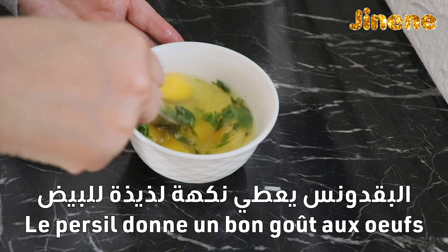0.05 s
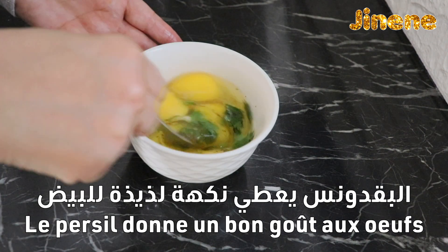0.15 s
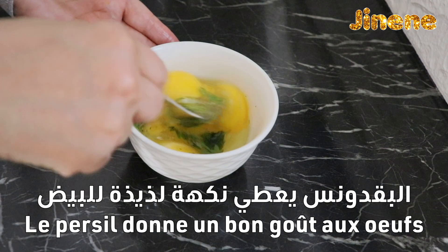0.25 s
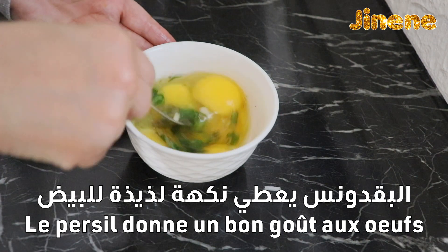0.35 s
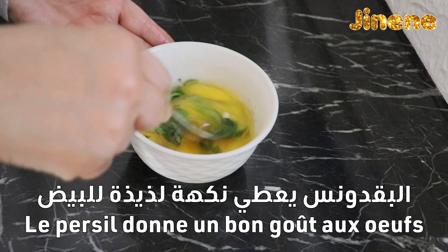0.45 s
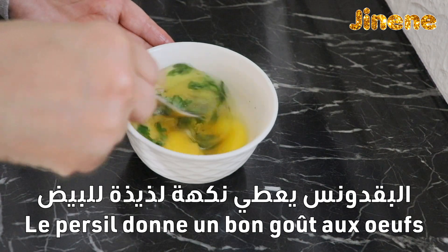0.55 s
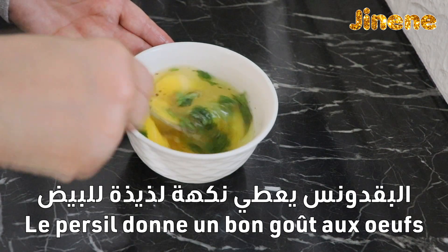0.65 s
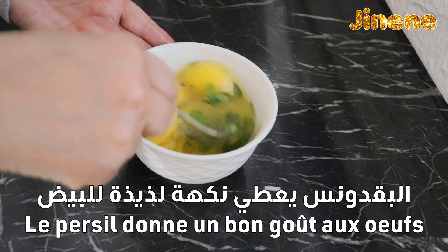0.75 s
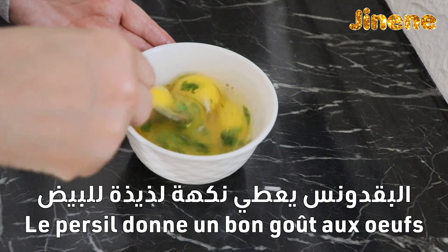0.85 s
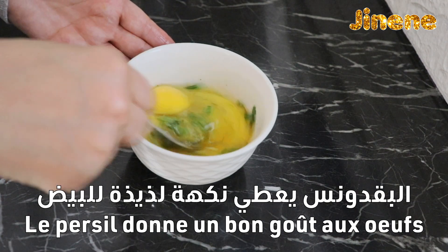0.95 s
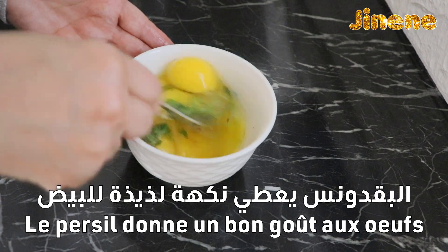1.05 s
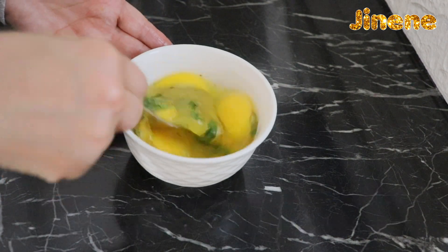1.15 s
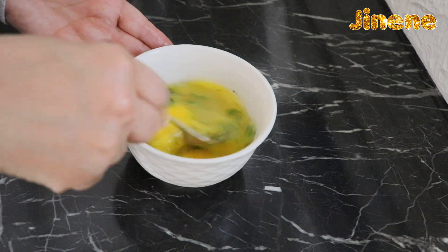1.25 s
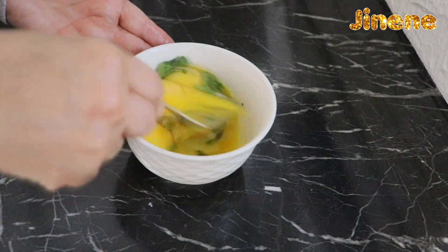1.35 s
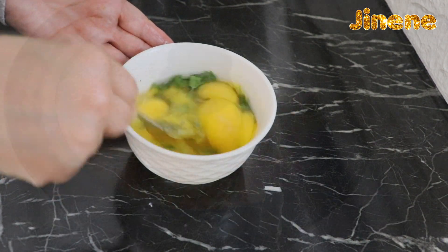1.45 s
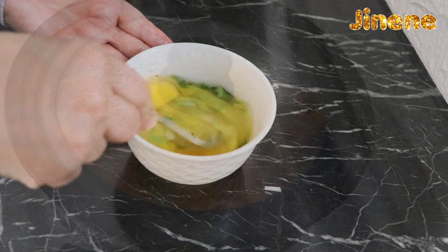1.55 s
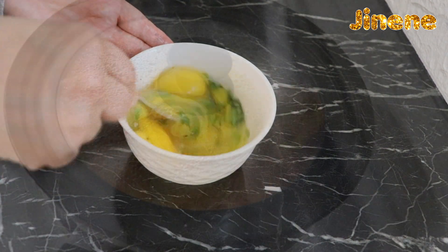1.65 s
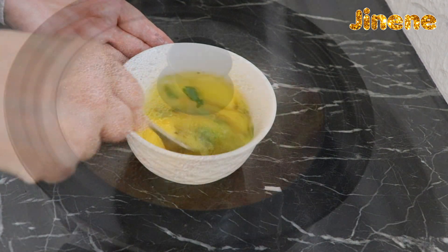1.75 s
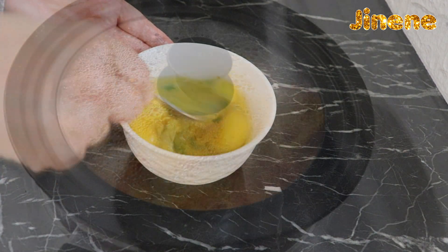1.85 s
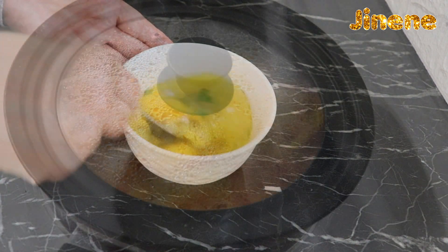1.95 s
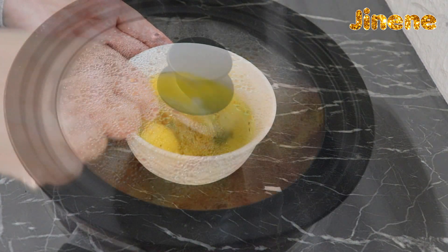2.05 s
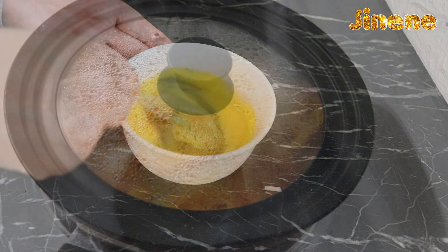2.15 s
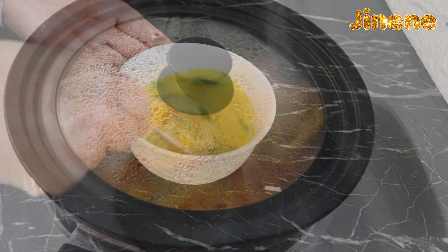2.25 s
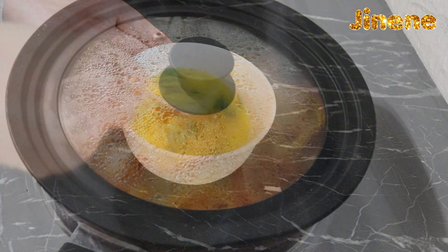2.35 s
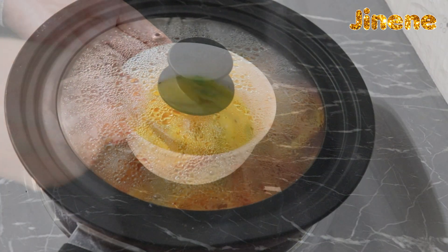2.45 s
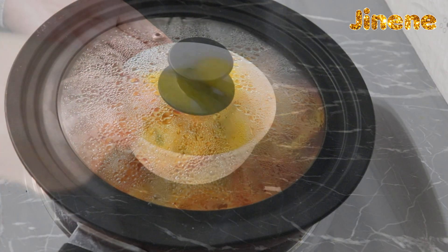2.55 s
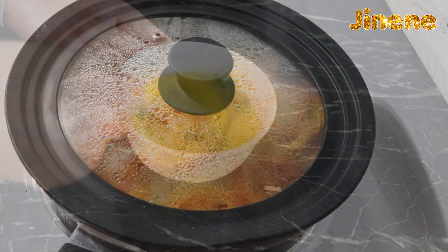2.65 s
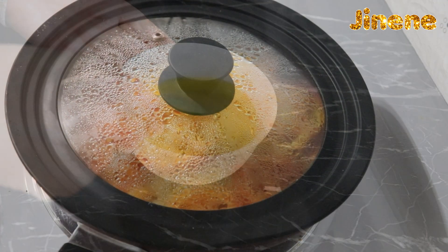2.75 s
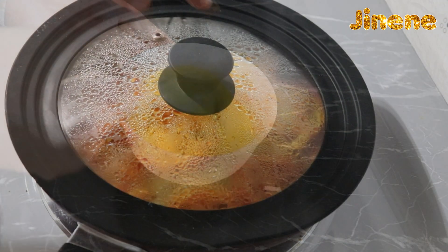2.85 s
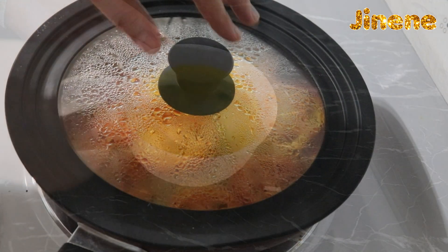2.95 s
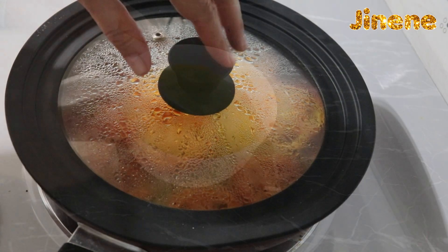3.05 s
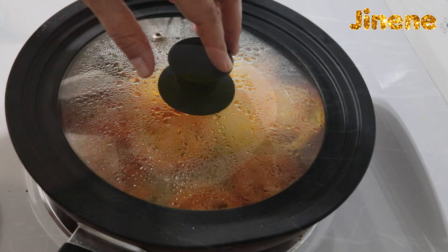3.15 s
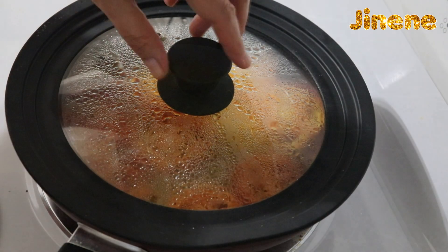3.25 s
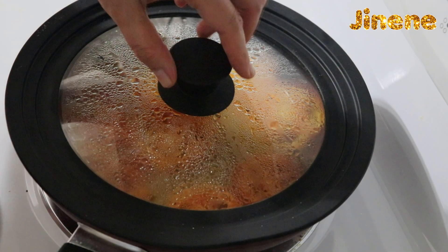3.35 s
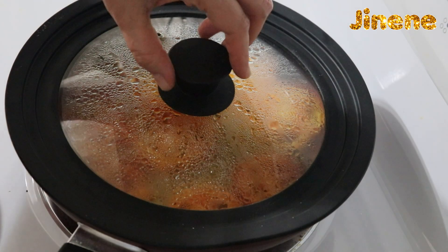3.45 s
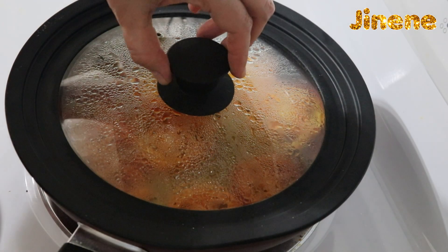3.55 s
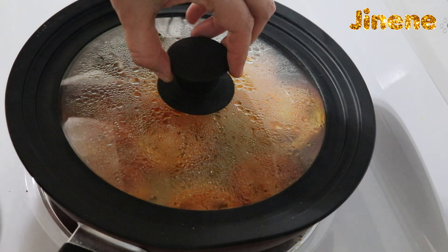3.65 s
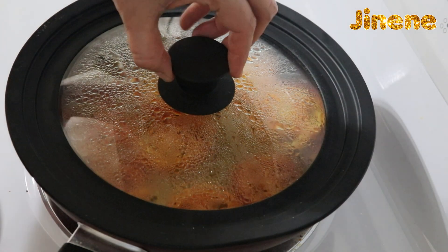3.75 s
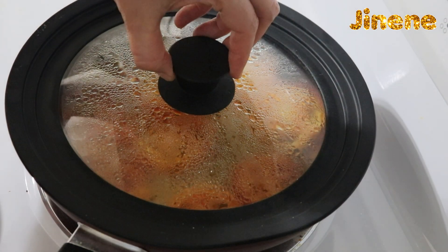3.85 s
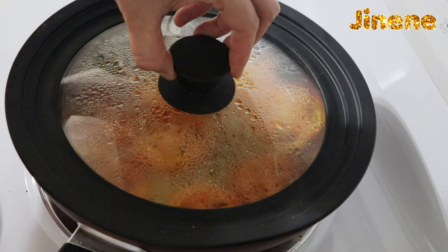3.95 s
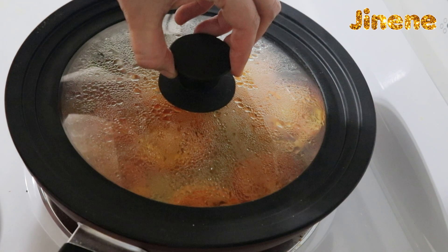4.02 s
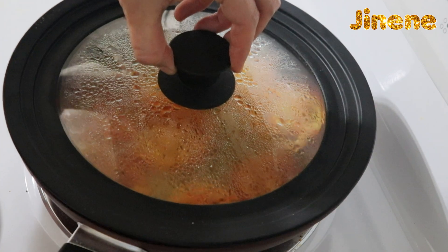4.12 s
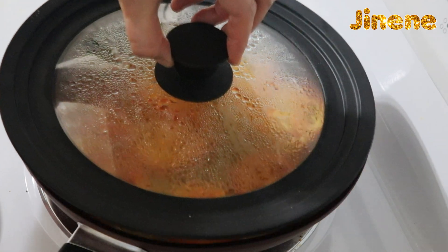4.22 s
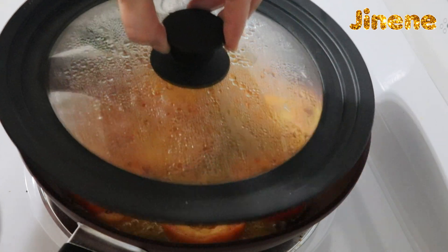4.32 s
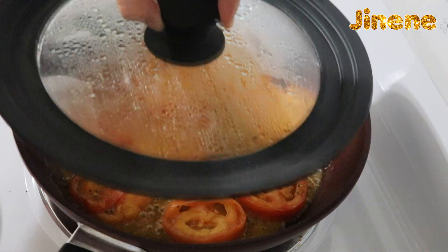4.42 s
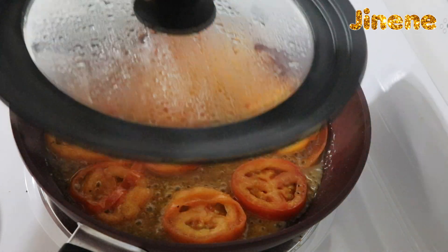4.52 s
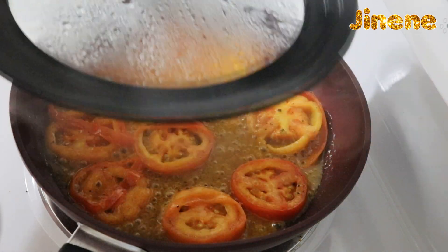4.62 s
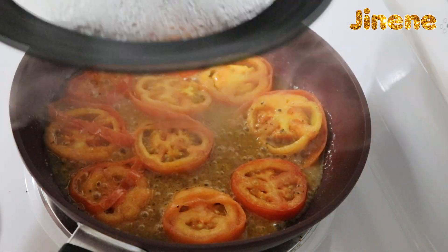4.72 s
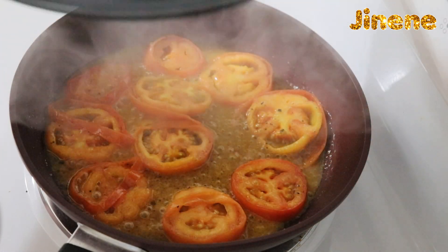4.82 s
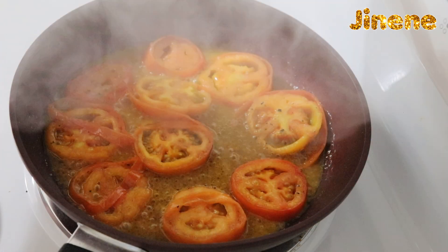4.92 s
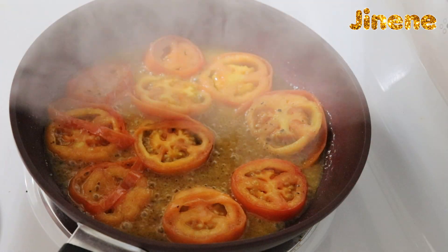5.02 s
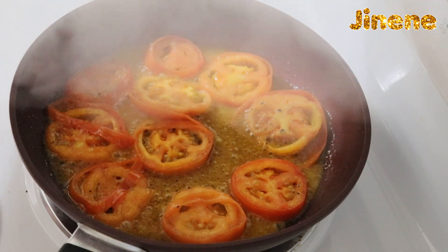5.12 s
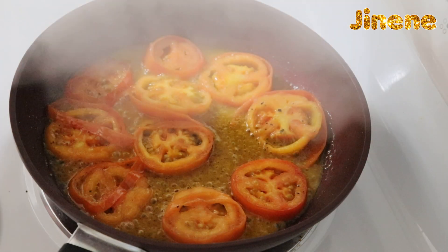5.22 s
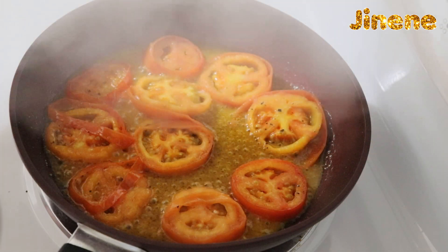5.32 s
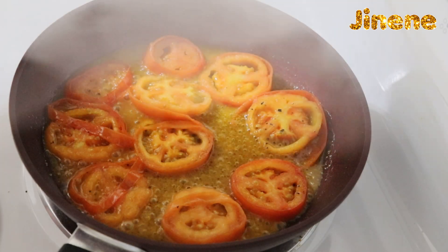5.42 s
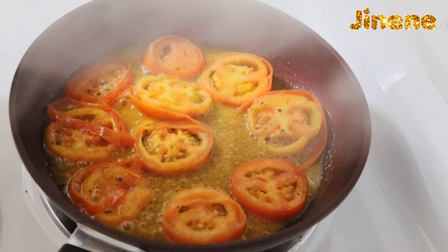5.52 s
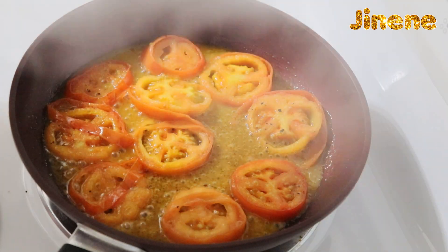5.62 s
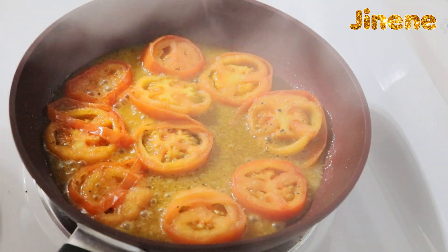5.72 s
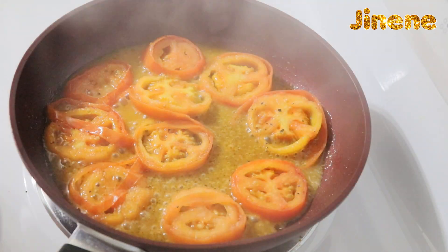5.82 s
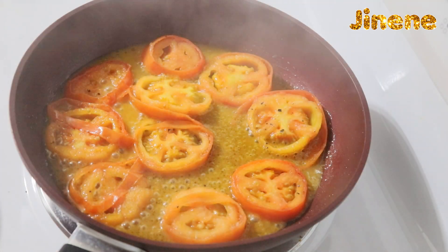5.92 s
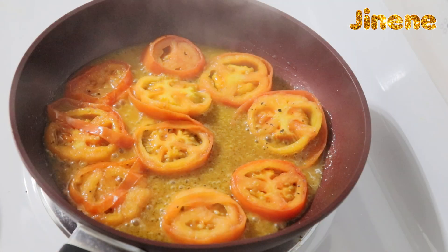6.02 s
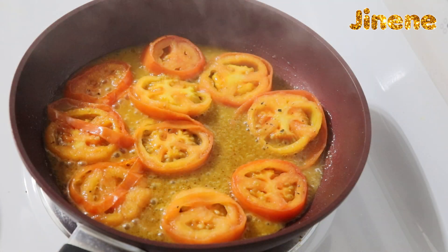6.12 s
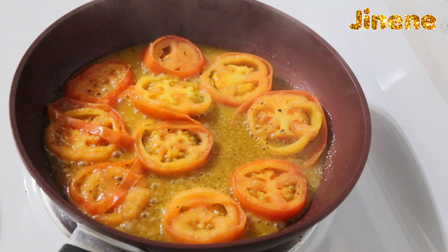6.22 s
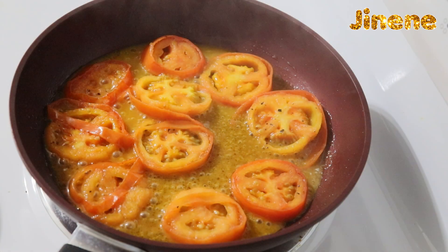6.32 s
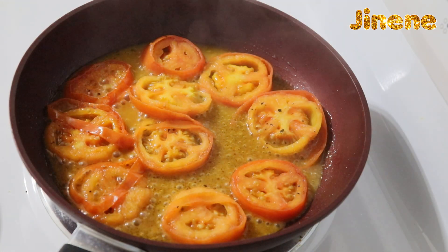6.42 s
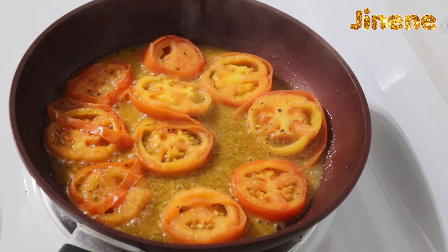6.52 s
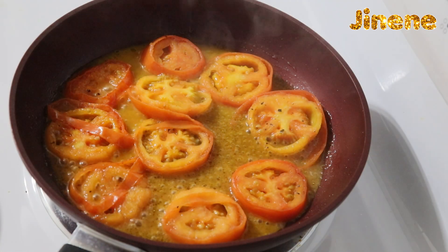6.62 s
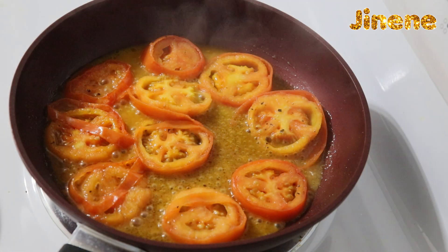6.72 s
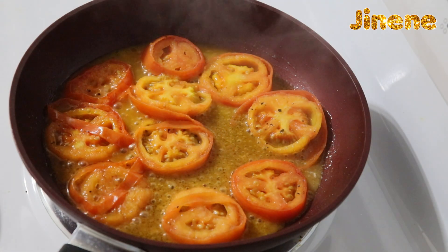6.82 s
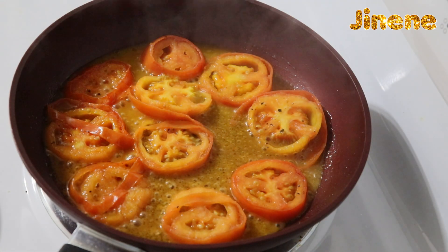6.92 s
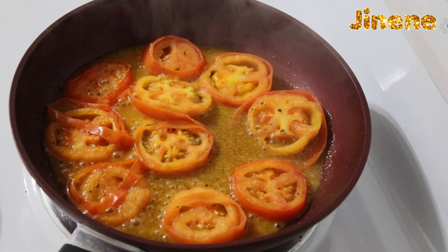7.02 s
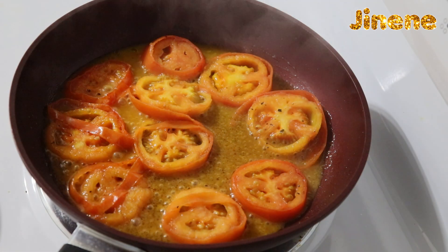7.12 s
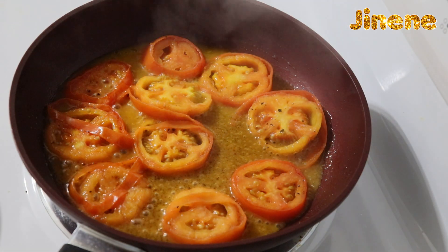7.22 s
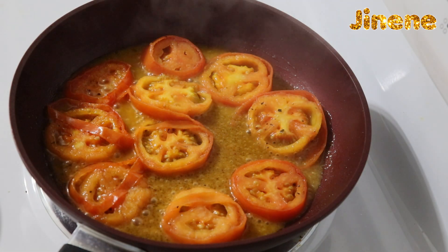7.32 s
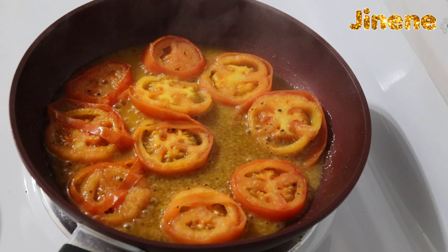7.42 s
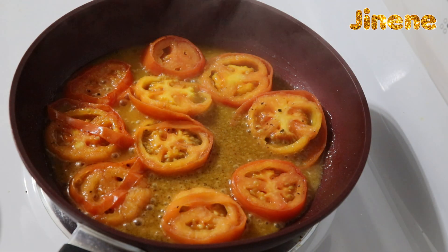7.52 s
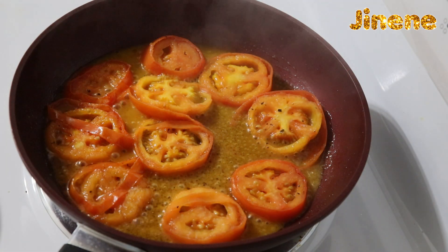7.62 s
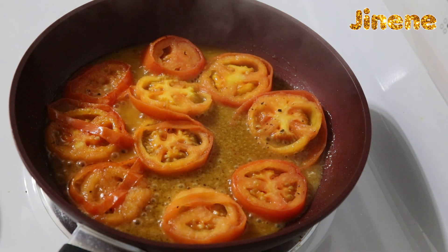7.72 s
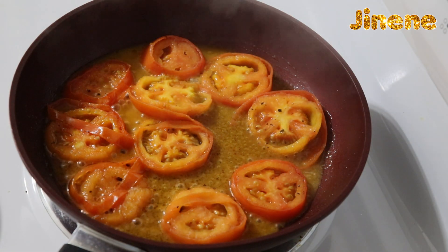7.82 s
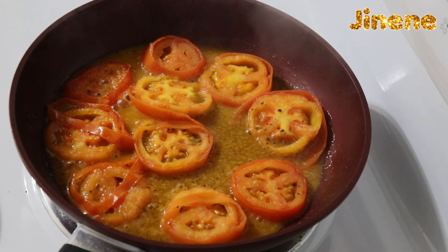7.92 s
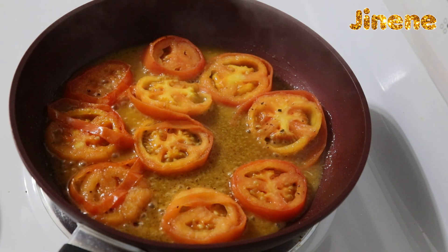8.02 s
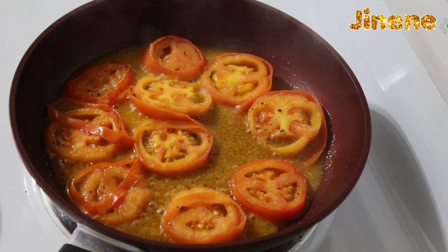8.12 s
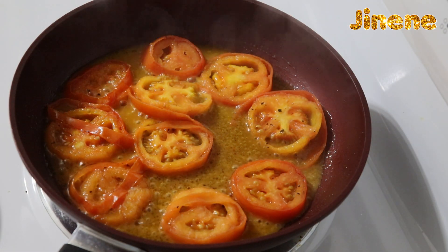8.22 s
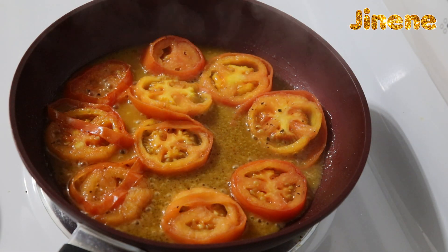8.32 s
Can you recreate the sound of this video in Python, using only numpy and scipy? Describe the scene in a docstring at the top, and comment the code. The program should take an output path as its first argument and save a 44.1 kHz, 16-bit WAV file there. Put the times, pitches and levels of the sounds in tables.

```python
"""A fork beats eggs in a ceramic bowl on a stone counter in a small kitchen, about six strokes a second.
Strokes clink through the bowl's damped modes and throw the egg over with low thuds; air pockets burst
as rising tones, tines squeak as gliding tones, and stirring adds a wet swish of noise and blips.
The beating fades away, then tomato slices sizzle in a pan of oil on a stove: ringing bubbles, crackle,
steam jets and spits, with a low simmer and rumble. Quiet room tone runs throughout."""
import sys
import numpy as np
from scipy import signal
from scipy.fft import rfft, irfft, next_fast_len
from scipy.io import wavfile
from scipy.ndimage import uniform_filter1d, map_coordinates

SR = 44100
rng = np.random.default_rng(int(sys.argv[2]) if len(sys.argv) > 2 else 0)


def log_audio(samples):
    """Write samples as a 16-bit WAV file to the path given in sys.argv[1]."""
    # one column per channel
    frames = np.atleast_2d(samples).T
    # limit to full scale, then quantise
    limited = np.clip(frames, -1, 1)
    pcm = np.round(limited * 32767).astype(np.int16)
    wavfile.write(sys.argv[1], SR, pcm)


N = 369116  # length in samples

# The turns of the fork. Each row: start in seconds, clink level in dB, clack (middle pitches) in dB,
# ping of the tines in dB beside the clink, scoop level in dB, landing level of the egg in dB,
# flight of the egg in seconds.
STROKES = [(0.0759, -13, -3.5, -32, -13, -11, 0.058), (0.2405, -11.5, -6.5, -11.5, -9.5, -15.5, 0.073),
           (0.4045, -10.5, 1, -30, -12, -13, 0.038), (0.57, -13.5, -7, 1, -17.5, -10, 0.043),
           (0.7135, -8.5, -4.5, -12, -9, -9.5, 0.064), (0.8803, -13, -10.5, -5, -13, -11.5, 0.054),
           (1.0484, -16, -7.5, -21, -17.5, -12, 0.042), (1.2023, -11, -3.5, -5, -15, -13.5, 0.052),
           (1.371, -8, -2.5, -27, -10, -7, 0.03), (1.5377, -11, -4, -11, -15.5, -14, 0.056),
           (1.706, -10.5, -0.5, -23, -13, -15.5, 0.036), (1.868, -13, -5.5, -17, -11.5, -23, .03),
           (2.0397, -11.5, -3, -19, -14, -13, .036), (2.2166, -11.5, -3.5, -12, -15.5, -16.5, .045),
           (2.383, -12, -5, -9.5, -15.5, -22, 0.05), (2.5568, -15, -14.5, -11.5, -13, -14.5, 0.027),
           (2.7083, -13, -3.5, -35, -21, -9.5, 0.047), (2.9034, -15, -6, -30, -18, -24, 0.025),
           (3.0754, -14.5, -5, -12, -20.5, -17, 0.063), (3.223, -16, -2, -20, -23, -16.5, 0.038)]

FADE_FROM_S, FADE_TO_S, FADE_POWER = 1.53, 3.364, 0.84  # the beating dies away
FRY_START_S = 3.51


def fork():
    """Each contact bites, rebounds and slides, heard through the damped bowl; the tines ping as well."""
    # Ringing of the tines. Each row: pitch in Hz, level in dB, time to fall 60 dB in seconds.
    tine_modes = [(6800, -4, .05), (7000, 4.5, 0.074), (7090, -4, .045)]
    # Tines scrape along the wall. Each row: start in seconds, length in seconds, level in dB.
    scrape_rows = [(0.219, .012, -39.5), (0.365, 0.019, -48), (1.032, .012, -40), (1.182, 0.017, -38.5),
                   (1.39, 0.043, -41), (1.523, .014, -30), (1.552, 0.039, -41), (1.861, .01, -31),
                   (2.015, 0.029, -49), (2.201, 0.015, -39), (2.368, 0.015, -36.5), (2.535, 0.041, -37),
                   (2.75, 0.044, -38), (2.873, 0.011, -36), (3.06, 0.0081, -36.5), (3.226, .016, -26.5)]
    rebound_s, rebound_loss_db = 0.0075, 12.5  # the fork chatters back onto the wall
    grit_db, grit_t60_s = -19, 0.21  # gritty slide after each contact
    out = np.zeros((2, N))
    t = np.arange(SR // 8) / SR
    lead_s = .004  # room for the rise before a contact's peak
    for start_s, db, clack_db, glint_db, ping_db in contacts():
        press = touch(t - lead_s) + amp(grit_db) * fade(t, grit_t60_s) * (t > lead_s)
        for k, (late, hard) in enumerate(rng.standard_normal((2, 2)), 1):
            delay_s = k * rebound_s * np.exp(0.17 * late)
            press += amp(2 * hard - rebound_loss_db * k) * touch(t - lead_s - delay_s)
        clink = bowl(grit(len(t)) * press, clack_db, glint_db)
        loudness = strength(np.hypot(*clink) / np.sqrt(2), 0.0027)
        add(out, start_s - lead_s + .0005, amp(db - 3.5) * clink / loudness)
        ping = ring(tine_modes, t, scatter_db=1.5, detune=0.0035)
        add(out, start_s, amp(db + ping_db - 7.5) * ping)
    for start_s, length_s, db in scrape_rows:
        size = int(length_s * SR)
        scrape = bowl(grit(size) * np.sqrt(np.hanning(size)), clack_db=-1, glint_db=-16)
        add(out, start_s, amp(db - 1) * scrape / strength(scrape[0], length_s))
    # the glint beams to the left, the clack to the right
    return leaned(out, [(600, 0.13), (2200, -0.69), (4500, 0.1), (8000, -1.0), (13000, 1.34)])


def contacts():
    """Every blow of fork on bowl: start in seconds, then clink, clack, glint and ping in dB."""
    # Stray knocks between strokes. Each row: start in seconds, clink level in dB, clack in dB,
    # ping in dB beside the clink.
    knock_rows = [(0.7019, -14, 2, -9), (1.331, -31, -1, -22), (1.3475, -32, 1, -23), (1.508, -29, -1, -18),
                  (1.8139, -19.5, 0, -25), (2.159, -30.5, -11, -7), (2.194, -26.5, -25, -6),
                  (2.7426, -15.5, 3, -23), (2.851, -29, 4, -27), (2.8882, -20, 1, -26),
                  (3.243, -12, -5.5, -23.5)]
    stroke_glint_db, knock_glint_db = -11, -17.5  # the top treble
    rows = [(s, db, clack_db, stroke_glint_db, ping_db) for s, db, clack_db, ping_db, *_ in STROKES]
    return rows + [(s, db, clack_db, knock_glint_db, ping_db) for s, db, clack_db, ping_db in knock_rows]


def touch(t):
    """The force of one contact, rising quickly to its peak at t = 0 and falling a little slower."""
    bite_s, release_s = 0.0047, 0.0083  # time over 60 dB, for the rise and for the fall
    return fade(np.abs(t), np.where(t < 0, bite_s, release_s))


def grit(size):
    """Spiky noise of tiny slips; it scatters inside the bowl, differently toward each microphone."""
    slips = amp(3.6 * np.clip(rng.standard_normal(size), -2, 2))
    return unit(slips * (0.8 * rng.standard_normal(size) + rng.standard_normal((2, size))))


def bowl(force, clack_db, glint_db):
    """The egg-damped bowl answers a force on its wall with many short-lived tones."""
    # Ringing of the bowl. Each row: pitch in Hz, level in dB, time to fall 60 dB in seconds.
    bowl_modes = [(1576, 5, 0.016), (2250, -4, 0.0077), (2795, 9.5, 0.024), (3760, 13.5, 0.0049),
                  (4640, -18, .015), (5180, 14, 0.0096), (6270, 16.5, 0.0059), (6865, 20, 0.0049),
                  (7640, 10, 0.0058), (8100, 13.5, .007), (8700, 12, 0.0093), (9420, 8, 0.01),
                  (10610, 17, 0.0049), (11650, 7, 0.0074), (12840, 22, 0.0059), (13700, 5, 0.0053),
                  (14400, 24, 0.0056), (14800, 8, 0.0062)]
    answer = ring(bowl_modes, np.arange(SR // 30) / SR, scatter_db=2.6, detune=.004)
    sound = signal.fftconvolve(force, answer[None], axes=1)
    return colour(sound, [(400, -46.5), (1400, clack_db + 5.5), (3200, clack_db + 4.5),
                          (5000, 0), (10000, 2.5), (13000, glint_db + 7.5)])


def egg():
    """A fold of egg lands softly and tumbles on, and its push makes egg and bowl thud on the counter."""
    # Egg and bowl on the counter. Each row: pitch in Hz, level in dB, time to fall 60 dB in seconds.
    body_modes = [(42, -27.5, 0.27), (96.4, -17.5, 0.25), (111.6, -21, 0.32), (151.1, -9.5, 0.26),
                  (166.6, -1, 0.22), (198, -14.5, 0.23), (225.1, -6, 0.18), (259, -4, 0.12),
                  (313.3, -15.5, 0.16), (347, -9.5, .12), (412, -20, 0.17), (470, -20, 0.26)]
    out = np.zeros(N)
    t = np.arange(SR // 4) / SR
    for start_s, db, slap_db in slops():
        push = .02 * rng.standard_normal(len(t)) * fade(t, .08)
        push[0] += 1
        body = ring(body_modes, t, scatter_db=3.5, detune=0.011) * (1 - fade(t, 0.014))  # soft onset
        thud = signal.fftconvolve(push, body)[:len(t)]
        thud = colour(thud, [(25, -47), (42, -4), (58, -28.5), (72, -27.0), (90, 0.0), (200, -4.5),
                             (330, slap_db + 14.5), (500, slap_db + 8.5), (850, 1.5), (2000, -12.0)])
        add(out, start_s, amp(db - 9.5) * thud / strength(thud, 0.024))
    return out


def slops():
    """Strokes scoop egg that lands again, and folds tumble: start in seconds, level and slap in dB."""
    # The landed fold rolls over once more. Each row: start in seconds, level in dB.
    tumble_rows = [(.16, -18.5), (.272, -12), (.455, -18), (.64, -15.5), (0.801, -16), (.955, -17),
                   (1.26, -17), (1.455, -17), (1.621, -17.5), (1.769, -23), (1.943, -21.5), (2.12, -14.5),
                   (2.3, -16.5), (2.455, -15.5), (2.646, -15), (2.808, -11.5), (2.975, -17), (3.16, -23)]
    scoop_slap_db, land_slap_db, tumble_slap_db = -14, -14, -18.5  # slap in the low middle pitches
    rows = [(s, db, tumble_slap_db) for s, db in tumble_rows]
    for start_s, *_, scoop_db, land_db, flight_s in STROKES:
        rows.append((start_s + 0.002, scoop_db, scoop_slap_db))
        rows.append((start_s + flight_s, land_db, land_slap_db))
    return rows


def squelches(count=4):
    """Each air pocket breaks with a wet snap and rings as a rising bubble, then a few smaller ones."""
    # Air pockets burst in the egg. Each row: start in seconds, level in dB, starting pitch in Hz.
    pocket_rows = [(0.136, -34, 1060), (0.436, -17.5, 1260), (.447, -20, 1200), (0.613, -30, 1230),
                   (0.672, -24.5, 960), (0.673, -28, 1420), (0.7017, -9, 1615), (.704, -20, 965),
                   (.709, -15, 2000), (.842, -29, 1260), (0.896, -16, 2240), (.902, -16.5, 1890),
                   (1.095, -37, 930), (1.149, -27.5, 1000), (1.343, -28, 930), (1.348, -11.5, 3680),
                   (1.384, -21.5, 790), (1.531, -10, 2400), (1.677, -26.5, 1390), (1.696, -18, 4150),
                   (1.774, -25, 1150), (1.807, -16, 2920), (1.814, -18, 1045), (1.99, -39, 960),
                   (2.04, -22, 920), (2.079, -12.5, 2720), (2.159, -26, 950), (2.205, -24, 1970),
                   (2.386, -24, 1070), (2.46, -33.5, 850), (2.559, -10, 2610), (2.566, -27, 1500),
                   (2.709, -3, 3760), (2.71, -20, 510), (2.749, -25, 1070), (2.81, -26.5, 950),
                   (2.887, -19, 820), (2.888, -10.5, 4050)]
    out = np.zeros(N)
    t = np.arange(SR // 20) / SR
    for start_s, db, hz in pocket_rows:
        burst = np.pad(rng.standard_normal(len(t)) * fade(t, 0.0074), (64, 0))
        snap = filtered(burst, lambda f: 1 / (1 + (1.6 * np.log((f + 1) / hz)) ** 2))
        add(out, start_s - 64 / SR, amp(db - 14.5) * snap / strength(snap, 0.0024))
        for k in range(count):
            pitch = hz * np.exp(0.12 * np.sqrt(k) * rng.standard_normal())
            rising_tone = np.sin(2 * np.pi * pitch * (t + 3 * t ** 2))
            bubble = rising_tone * fade(t, 28 / pitch) * (1 - fade(t, 0.0031))
            add(out, start_s + 0.004 * k * rng.uniform(0.6, 1.4), amp(db - 6 * k) * bubble)
    return out


def squeaks():
    """Tines stick and slip on the glaze: thin gliding squeaks that ring on when the tine comes free."""
    # Each row: start in seconds, length in seconds, start pitch in Hz, end pitch in Hz, level in dB,
    # time for the ring to fall 60 dB in seconds.
    squeak_rows = [(1.05, 0.035, 3020, 3000, -55.5, 0.34), (1.584, 0.056, 4000, 3740, -52, .05),
                   (1.923, 0.059, 4770, 4660, -55, 0.24), (1.96, 0.038, 4380, 3420, -53, 0.033),
                   (1.99, .035, 3400, 3560, -54, .05), (2.137, 0.045, 2900, 3020, -51.5, 0.22),
                   (2.31, 0.033, 2850, 2930, -51, .05), (2.335, 0.023, 3010, 3140, -49.5, 0.37),
                   (2.493, .016, 4200, 3950, -60, .03), (2.507, .045, 3750, 3895, -44.5, 0.44),
                   (2.65, 0.057, 2620, 2500, -56.5, .05)]
    out = np.zeros(N)
    waver = 1 + .015 * wobble(700)  # unsteady pitch
    grip = amp(3.6 * wobble(160))  # unsteady loudness
    t = np.arange(SR // 3) / SR
    for start_s, length_s, from_hz, to_hz, db, t60 in squeak_rows:
        first = int(start_s * SR)
        here = slice(first, first + len(t))
        glide = np.minimum(t / length_s, 1)
        pitch = (from_hz + (to_hz - from_hz) * glide) * waver[here]
        envelope = np.sqrt(np.minimum(2 * glide, 1)) * fade(np.maximum(t - length_s, 0), t60)
        tone = np.sin(2 * np.pi * np.cumsum(pitch) / SR)
        add(out, start_s, amp(db + 11) * grip[here] * envelope * tone)
    return out


def stirring():
    """A soft wet swish with tiny blips as the fork drags through egg and parsley."""
    # Colour of the blips. Each row: pitch in Hz, level in dB.
    wet_colour = [(300, 15.5), (600, -8.5), (1300, -7), (2800, -4), (6000, -4), (16000, -38.5)]
    stir_db, swell_db, peak_s = -40, 2, 0.043  # strongest just after the clink
    starts = [stroke[0] for stroke in STROKES]
    turns = np.interp(np.arange(N) / SR - peak_s, starts, np.arange(len(STROKES)), left=.5)
    level_db = stir_db + swell_db * np.cos(2 * np.pi * turns)
    blips = bubbles(rate=260, low_hz=598, high_hz=4770, cycles=21, size_db=2.0)
    blips = unit(colour(blips, wet_colour))
    swish = unit(colour(rng.standard_normal(N), [(300, 12.5), (900, -4.0), (1500, -4), (4000, -14.0),
                                                 (9000, -18), (15000, -32)]))
    return amp(level_db + 1.97 * wobble(29.84)) * (blips + amp(1.0) * swish)


def frying():
    """Water boils out of hot oil: clumped ringing bubbles and crackle on fizz, steam jets and spits."""
    # Colours of the oil and of the spray. Each row: pitch in Hz, level in dB.
    oil_colour = [(290, -54), (500, -31), (553, -19), (988, -25), (1620, -14.5), (2230, -10), (2570, -3),
                  (2850, -13), (3110, -2.5), (4210, -3), (5020, -9.5), (5550, -6.5), (6900, -14.5),
                  (15100, -27.5), (16000, -45)]
    spray_colour = [(3000, -25), (6000, 4), (8500, 1), (10500, -11.5), (12000, -24), (15500, -17)]
    # steady heat: reference level and drift in dB, with 0.76 drift points a second
    sizzle_db = -43.5 + 0.39 * wobble(0.76)
    steam_db = -56  # faint fizz, also between the jets
    clumps = amp(2.0 * wobble(100) + .8 * wobble(18))
    boil = bubbles(rate=600, low_hz=2520, high_hz=4420, cycles=29, size_db=7.5)
    boil = amp(sizzle_db - 7.0) * clumps * boil
    # bubbles trapped under the slices ring at two favoured pitches
    lower = bubbles(rate=90, low_hz=2580, high_hz=2710, cycles=33, size_db=2.5)
    upper = bubbles(rate=70, low_hz=2980, high_hz=3050, cycles=65, size_db=3.5)
    boil = boil + amp(sizzle_db - 10.5) * lower + amp(sizzle_db - 10.0) * upper
    crackle = unit(colour(clumps * pops(rate=1300, spread_db=4.5, width=0.33), oil_colour))
    crackle = amp(sizzle_db - 2.5) * crackle
    fizz = amp(sizzle_db - 7.5 + 0.8 * wobble(25)) * unit(colour(hiss(width=0.31), oil_colour))
    beads = bubbles(rate=500, low_hz=4720, high_hz=6880, cycles=15.6, size_db=5.5)
    beads = amp(sizzle_db - 8.5) * beads
    ticks = colour(pops(rate=260, spread_db=0, width=0.85),
                   [(2000, -24.0), (6000, -16.0), (12300, 3.5), (15000, 0.5)])
    ticks = amp(-61.0) * unit(ticks)
    steam = unit(colour(pops(rate=1400, spread_db=5.0, width=0.93), spray_colour))
    spray = jets() + amp(steam_db) * steam
    pan = boil + crackle + fizz + beads + ticks + spray + spits()
    pan = kitchen(pan * (np.arange(N) / SR > FADE_TO_S),
                  wet_db=-7.0, t60=0.25, near_db=-5.0, near_t60=0.015, lag_us=33.0, count=40)
    # the right microphone hears more of the crackle's body
    return leaned(pan, [(1000, -0.34), (2800, -1.25), (5000, -0.11), (9000, 0.57)])


def spits():
    """Drops burst in the oil, each a very short puff of noise in a narrow band."""
    # The largest drops. Each row: start in seconds, level in dB.
    large_rows = [(3.7583, -26.5), (3.848, -28), (4.047, -29), (4.329, -25.5), (4.620, -24),
                  (4.7955, -24.5), (4.89, -26), (5.3664, -28.5), (5.829, -26.5), (5.9518, -23),
                  (6.525, -25), (6.813, -24), (6.9907, -25), (7.561, -27.5), (8.022, -26), (8.1487, -27),
                  (8.238, -26.5)]
    out = np.zeros(N)
    t = np.arange(SR // 40) / SR
    for start_s, db in [*large_rows, *small_spits()]:
        spit = np.pad(rng.standard_normal(len(t)) * fade(t, 0.0071), (32, 0))
        spit = colour(spit, [(1500, -44), (2500, 7.0), (4300, 2.0), (5500, -42), (15000, -41.0)])
        add(out, start_s, amp(db + 0.5) * spit / np.abs(spit).max())
    return out


def small_spits(count=130):
    """Small drops burst at random while the pan fries: start in seconds, level in dB."""
    frying_s = N / SR - FRY_START_S
    return [(FRY_START_S + when * frying_s, -34 + 6 * (size - .5)) for when, size in rng.random((count, 2))]


def jets():
    """Each jet of steam through the oil is a spluttering run of tiny bursts around one pitch."""
    # Each row: start in seconds, length in seconds, level in dB, pitch in Hz.
    jet_rows = [(4.143, 0.29, -47, 5540), (4.32, .025, -46.5, 7800), (4.618, 0.027, -47, 8850),
                (4.706, 0.063, -49, 9000), (4.768, .1, -54, 7200), (6.18, 0.62, -49.5, 5550),
                (6.41, .18, -55, 8000), (6.801, 0.054, -49.5, 8500), (6.894, 0.073, -49, 8550)]
    out = np.zeros((2, N))
    for start_s, length_s, db, hz in jet_rows:
        size = int(length_s * SR)
        bursts = (rng.random(size) < 900 / SR) * rng.uniform(.3, 1, size)
        bursts = bursts * (1 + 1.1 * rng.standard_normal((2, size)))
        fizz = filtered(bursts, lambda f: 1 / (1 + (6 * np.log((f + 1) / hz)) ** 2))
        add(out, start_s, amp(db) * unit(fizz) * np.sqrt(np.hanning(size)))
    return out


def stove():
    """The low simmer around the hot pan is fluttering noise; a deep rumble swells now and then."""
    # Colour of the simmer. Each row: pitch in Hz, level in dB.
    simmer_colour = [(15, -30), (25, -7.5), (155, -3), (195, 2.5), (253, -8), (412, -6), (441, -13.5),
                     (482, -5.5), (583, -17.5), (983, -13.5), (1600, -25), (2080, -11.5), (3520, -120)]
    # Swells of the rumble. Each row: start in seconds, length in seconds, level in dB.
    swell_rows = [(6.25, 0.46, -54), (7.88, 0.29, -44)]
    deep = colour(hiss(width=0.71), [(15, -9), (35, 5), (60, -6), (110, -35), (400, -68.5)])
    rumble = (amp(-66) + swells(swell_rows)) * unit(deep)
    flutter = amp(wobble(12))
    simmer = filtered(hiss(width=0.16), lambda hz: amp(along(simmer_colour, hz)) * hz / np.hypot(hz, 55))
    return rumble + amp(-53.0) * flutter * unit(simmer)


def swells(rows):
    """A rounded rise and fall for each row of start in seconds, length in seconds and level in dB."""
    out = np.zeros(N)
    for start_s, length_s, db in rows:
        add(out, start_s, amp(db) * np.sqrt(np.hanning(int(length_s * SR))))
    return out


def room_tone():
    """The quiet room is soft, steady noise, different in each ear."""
    # Colour of the room. Each row: pitch in Hz, level in dB.
    quiet_colour = [(20, 2), (42, -8), (90, 5.5), (250, -7.5), (700, -13.5), (3000, -27.5), (4800, -15),
                    (8000, -37), (16000, -46)]
    return amp(-53.0) * unit(colour(hiss(width=1.0), quiet_colour))


def kitchen(x, wet_db, t60, near_db, near_t60, lag_us, count):
    """Direct sound, quick worktop bounces and the room's duller tail; the left microphone is first."""
    x = np.broadcast_to(x, (2, N))
    hop = SR // count
    t = np.arange(int(.7 * t60 * SR)) / SR
    tail = fade(t, t60) * (t > .001)
    tail = amp(wet_db) * tail / np.linalg.norm(tail)
    near = fade(t, near_t60) * (t > .001)
    near = amp(near_db) * near / np.linalg.norm(near)
    window = np.sin(np.linspace(0, np.pi, 2 * hop))
    padded = np.pad(x, ((0, 0), (hop, 2 * hop)))
    walls = np.zeros((2, N + hop))
    # the source shifts about, so the pattern of echoes changes count times a second
    for start in range(0, N + hop, hop):
        part = padded[:, start:start + 2 * hop] * window
        if np.abs(part).max() > 1e-4:  # skip near silence
            noise = rng.standard_normal((2, len(t)))
            dull = (.7 * noise + .3 * np.roll(noise, 1, axis=1))[:, ::-1]
            add(walls, start / SR, signal.fftconvolve(part, near * noise + tail * dull, axes=1))
    # long waves reach both microphones alike
    mid = walls[0, hop:]
    side = signal.lfilter(*signal.butter(1, 900, "high", fs=SR), walls[1, hop:])
    taps = np.arange(-8, 9)
    direct = []
    for ear, lead in zip(x, (1, -1)):
        # a shift by a fraction of a sample: left earlier, right later
        shift = np.sinc(taps + lead * lag_us / 10 ** 6 * SR / 2) * np.hanning(len(taps))
        direct.append(np.convolve(ear, shift, "same"))
    return np.array(direct) + np.array([mid + side, mid - side]) / np.sqrt(2)


def bubbles(rate, low_hz, high_hz, cycles, size_db):
    """Small bubbles, each falling 60 dB in so many cycles at its own pitch and place; rms 1."""
    count = int(rate * N / SR)
    pitch, when, place, size = rng.random((count, 4)).T[:, :, None]
    hz = low_hz * (high_hz / low_hz) ** pitch
    t = np.arange(int(.7 * cycles / low_hz * SR)) / SR
    loudness = amp(-size_db * np.log(0.086 + size))
    grains = loudness * np.sin(2 * np.pi * hz * t) * fade(t, cycles / hz)
    index = ((when * N).astype(int) + np.arange(len(t))).ravel()
    ears = []
    for side in (1, -1):
        placed = grains * (1 + side * 2.35 * (place - .5))
        ears.append(np.bincount(index, placed.ravel(), N)[:N])
    return unit(np.array(ears))


def pops(rate, spread_db, width):
    """Random stereo impulses of rms 1, each with its own size and side."""
    size = (rng.random(N) < rate / SR) * amp(spread_db * np.clip(rng.standard_normal(N), -2, 2))
    sign = np.sign(rng.standard_normal(N))
    return unit(size * sign * (1 + width * np.outer([1, -1], rng.standard_normal(N))))


def hiss(width):
    """Stereo white noise of rms 1; width is side over mid."""
    mid, side = rng.standard_normal((2, N))
    return unit(np.array([mid + width * side, mid - width * side]))


def ring(modes, t, scatter_db, detune):
    """Decaying tones summed, each with a fresh strength and a slightly shifted pitch."""
    hz, db, t60 = np.transpose(modes)[:, :, None]
    size, shift = rng.standard_normal((2, *db.shape))
    tones = np.sin(2 * np.pi * hz * (1 + detune * shift) * t)
    return np.sum(amp(db + scatter_db * size) * tones * fade(t, t60), 0)


def wobble(rate):
    """A smooth random curve through rate random points a second."""
    knots = rng.standard_normal(int(N * rate / SR) + 4)
    steps = np.arange(0, len(knots) - 1, 1 / 8)
    return np.interp(np.arange(N) * rate / SR, steps, map_coordinates(knots, [steps]))


def fade(t, t60):
    """Exponential decay by 60 dB in t60 seconds."""
    return np.exp(-np.log(1000) * t / t60)


def filtered(x, response):
    """Multiply the spectrum of x by a response of frequency."""
    n = x.shape[-1]
    m = next_fast_len(n + SR // 10)
    return irfft(rfft(x, m) * response(np.fft.rfftfreq(m, 1 / SR)), m)[..., :n]


def colour(x, points):
    """Shape x by a spectrum of (Hz, dB) points."""
    return filtered(x, lambda hz: amp(along(points, hz)))


def leaned(x, lean):
    """Raise the left by (Hz, dB) points and lower the right by the same."""
    return np.array([colour(x[0], lean), filtered(x[1], lambda hz: amp(-along(lean, hz)))])


def along(points, hz):
    """Read (Hz, value) points on a log axis."""
    f, v = np.transpose(points)
    return np.interp(np.log(hz + 1), np.log(f + 1), v)


def add(track, start_s, sound):
    """Mix a sound into a track at a time in seconds."""
    start = max(0, round(start_s * SR))
    part = track[..., start:start + sound.shape[-1]]
    part += sound[..., :part.shape[-1]]


def strength(x, span_s):
    """Largest rms over a span of seconds."""
    return np.sqrt(uniform_filter1d(x ** 2, max(2, int(span_s * SR))).max() + 1e-20)


def unit(x):
    """Scale to rms 1."""
    return x / np.sqrt(np.mean(x ** 2) + 1e-20)


def amp(db):
    """Decibels to gain."""
    return 10 ** (np.asarray(db) / 20)


def scene():
    """The beating fades out, then the frying starts, over quiet room tone."""
    t = np.arange(N) / SR
    fade_out = np.clip((FADE_TO_S - t) / (FADE_TO_S - FADE_FROM_S), 0, 1) ** FADE_POWER
    heat_on = np.clip((t - FRY_START_S) / 0.016 + .5, 0, 1)
    clinks = kitchen(fork(), wet_db=-8.5, t60=.36, near_db=-8, near_t60=.06, lag_us=44, count=8)
    liquid = (squelches() + squeaks() + stirring()) * (t < FADE_TO_S)
    liquid = kitchen(liquid, wet_db=-6, t60=0.33, near_db=-6, near_t60=0.018, lag_us=45, count=12)
    thuds = kitchen(egg(), wet_db=-12, t60=.3, near_db=-15, near_t60=.03, lag_us=10, count=4)
    beating = fade_out * (clinks + liquid + thuds)
    return beating + heat_on * (frying() + stove()) + room_tone()


def record(dry):
    """The microphone rolls off the deepest bass, and nothing is kept above the band limit."""
    low_cut_hz, top_hz = 23, 15850
    return filtered(dry, lambda hz: hz ** 2 / (hz ** 2 + low_cut_hz ** 2) * (hz < top_hz))


dry = scene()
out = record(dry)
log_audio(out)
```